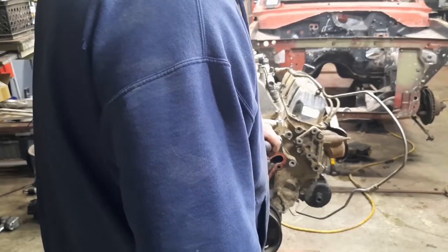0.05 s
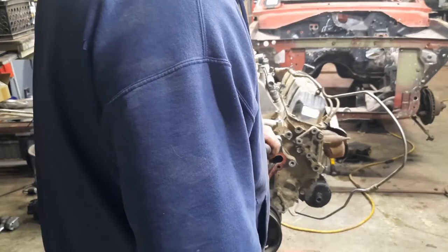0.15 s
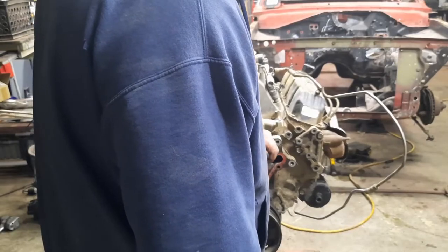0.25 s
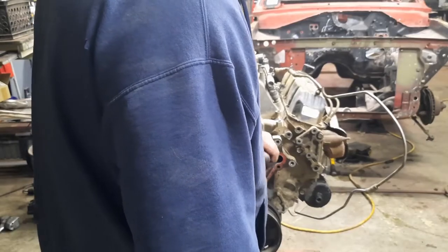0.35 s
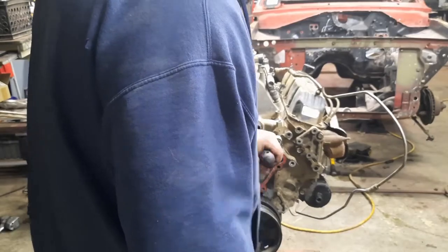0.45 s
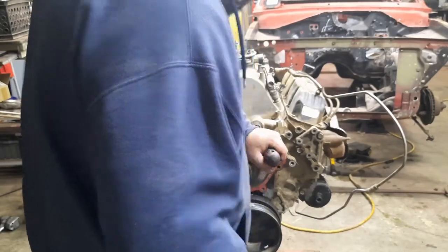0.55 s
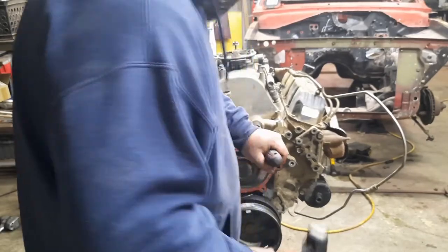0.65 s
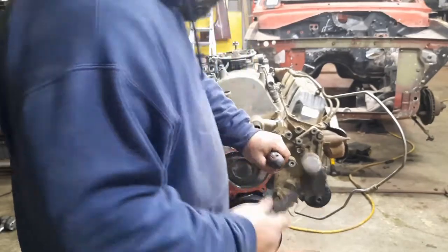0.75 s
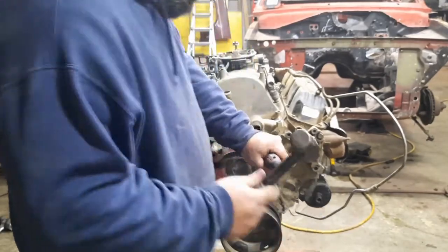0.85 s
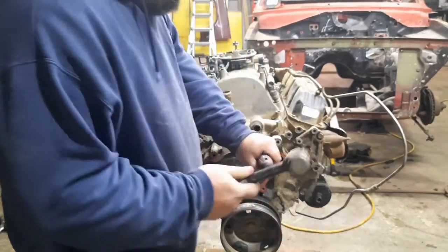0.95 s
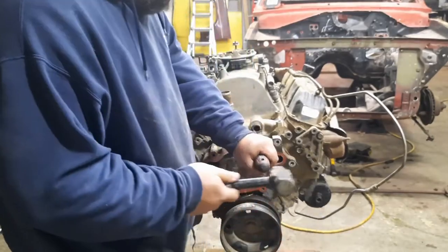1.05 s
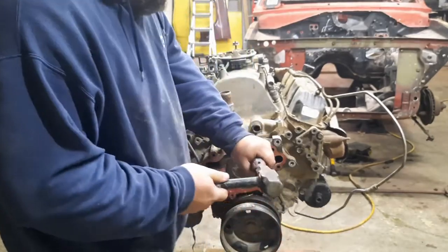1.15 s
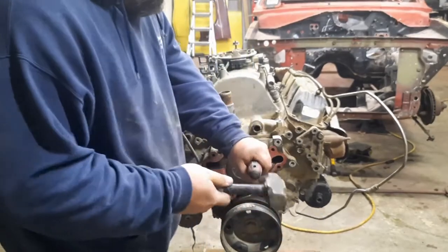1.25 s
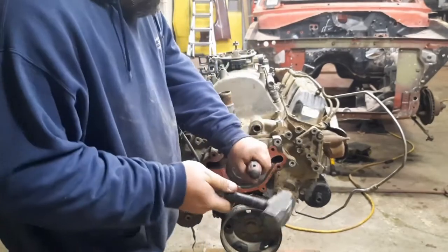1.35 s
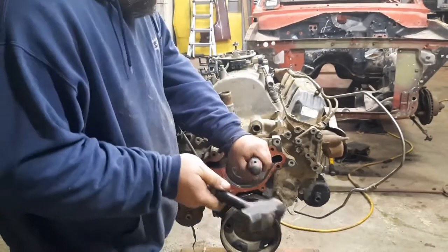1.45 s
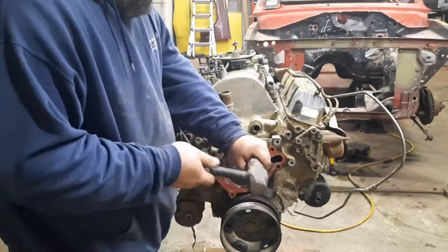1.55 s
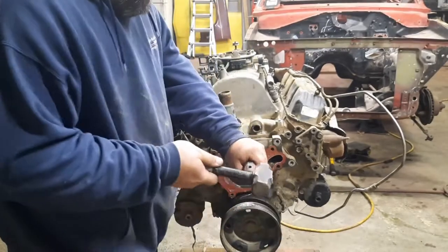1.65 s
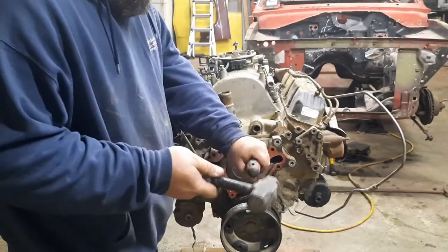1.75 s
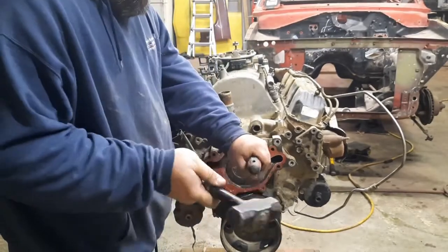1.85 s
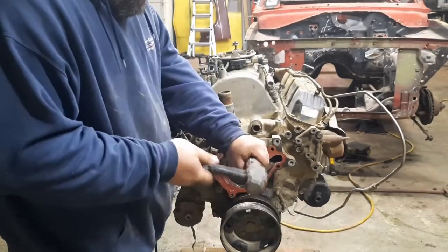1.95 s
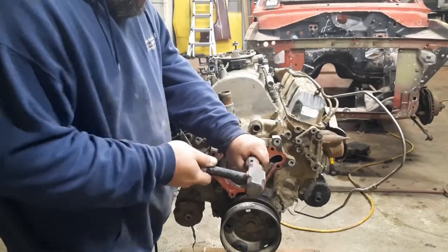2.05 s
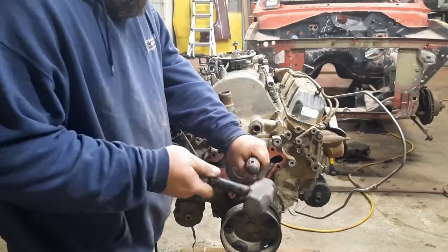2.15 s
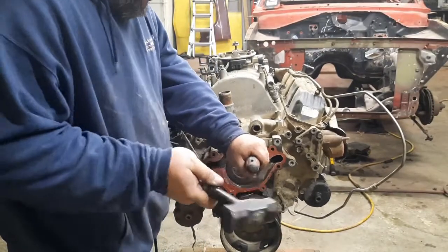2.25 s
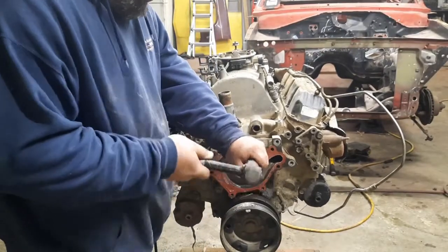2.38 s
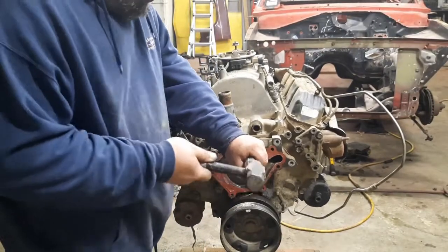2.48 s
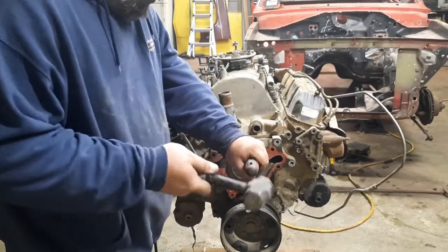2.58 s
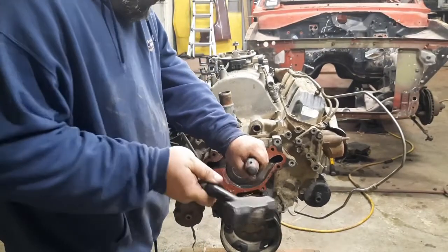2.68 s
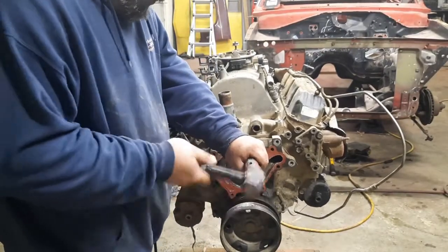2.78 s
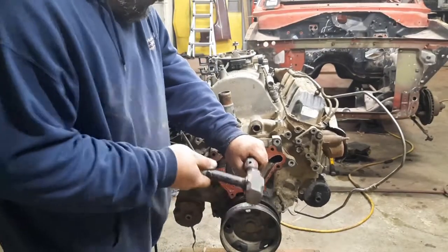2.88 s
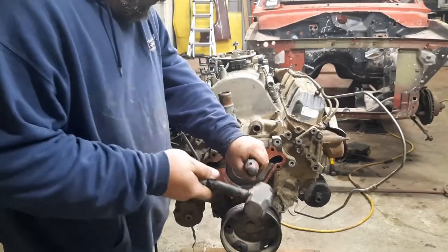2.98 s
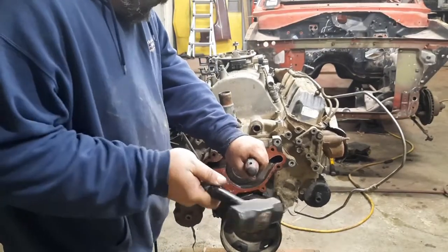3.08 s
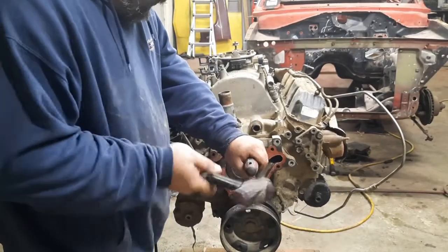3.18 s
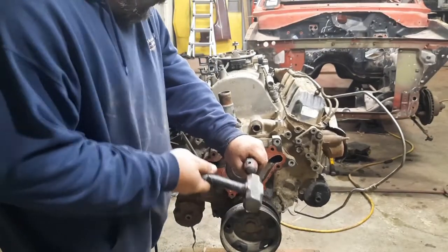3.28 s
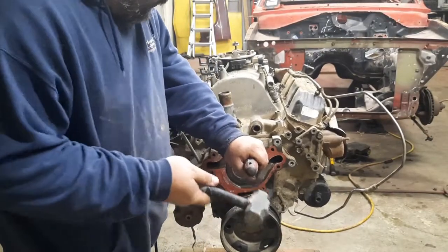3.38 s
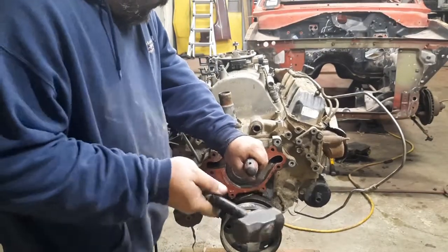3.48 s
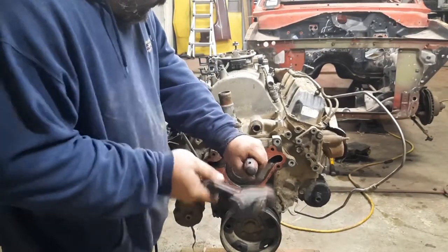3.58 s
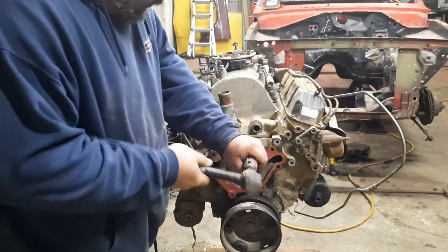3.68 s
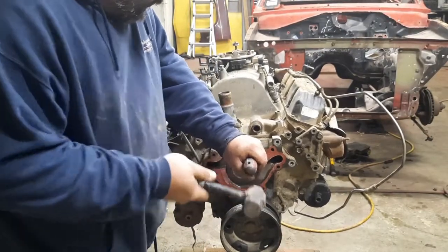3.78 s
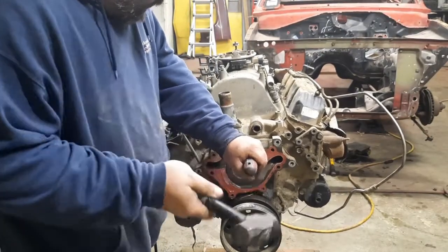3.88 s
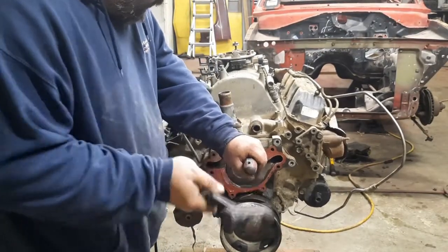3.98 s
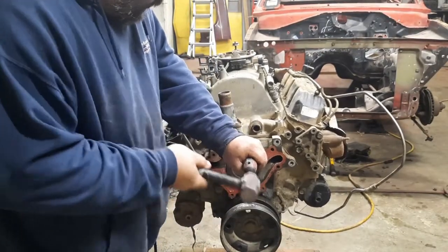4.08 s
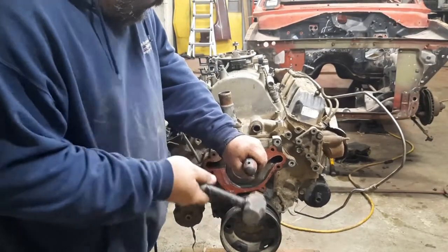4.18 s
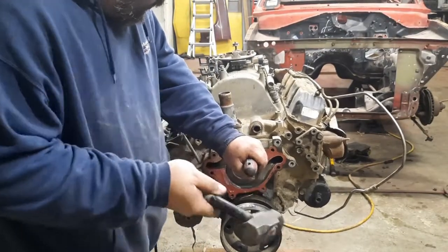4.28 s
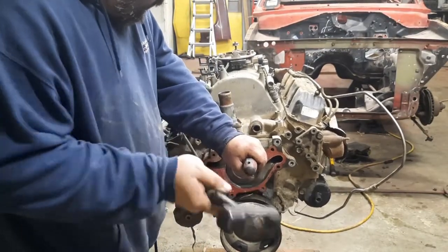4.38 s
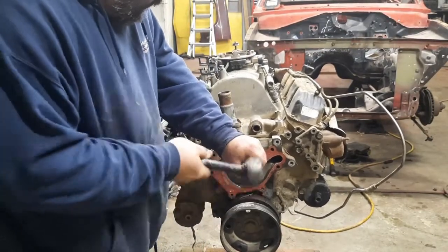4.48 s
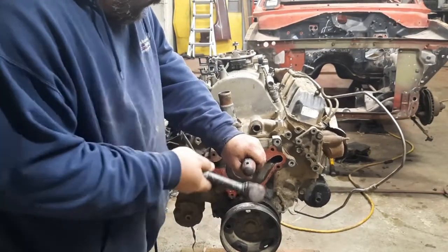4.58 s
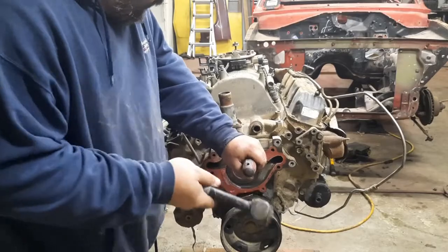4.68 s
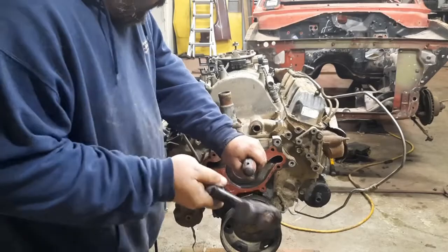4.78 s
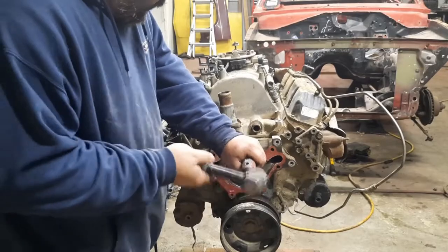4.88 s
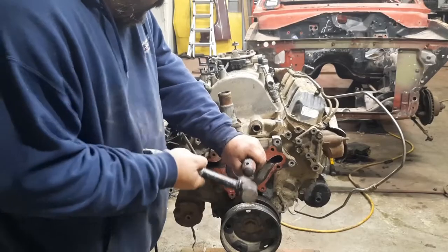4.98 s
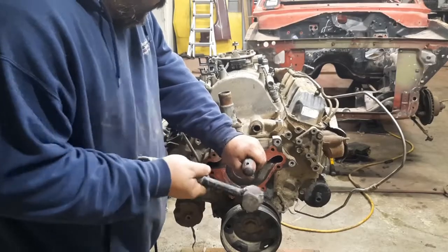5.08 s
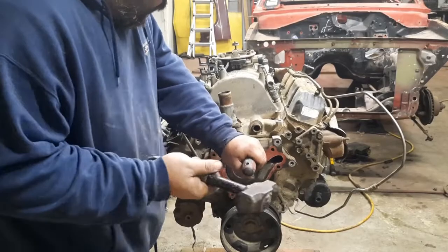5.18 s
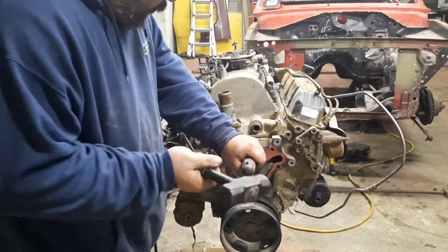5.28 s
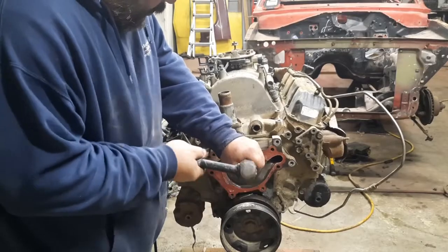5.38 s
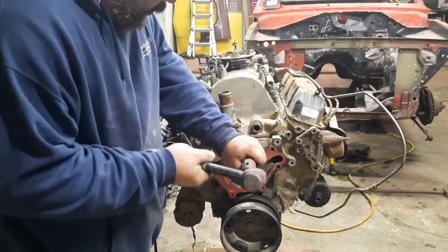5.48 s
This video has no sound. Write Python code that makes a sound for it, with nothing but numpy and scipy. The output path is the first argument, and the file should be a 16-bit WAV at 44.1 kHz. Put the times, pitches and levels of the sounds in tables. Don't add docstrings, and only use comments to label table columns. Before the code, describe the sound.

A hand hammer slides over iron, taps once, then clanks steadily against an engine, each hit booming and echoing off bare walls.

```python
import sys
import numpy as np
from scipy import signal
from scipy.fft import rfft, irfft, next_fast_len
from scipy.io import wavfile
from scipy.ndimage import uniform_filter1d, map_coordinates

SR = 44100
rng = np.random.default_rng(int(sys.argv[2]) if len(sys.argv) > 2 else 0)


def dump(signal):
    limited = np.clip(np.atleast_2d(signal).T, -1, 1)
    pcm = np.round(limited * 32767).astype(np.int16)
    wavfile.write(sys.argv[1], SR, pcm)


def natural_amplitude(level_db):
    exponent = np.asarray(level_db, float) / 20
    return 10 ** exponent


N = 243873

# mode in Hz, level in dB, t60 in s.
TOOL_MODES = [(1910, -3, 0.47), (2697, -7, 0.33), (3450, -2, 0.46), (3560, -7, 0.54), (5470, -9, 0.67),
              (5507, -11, 0.51)]
# start in s, rise in s, hold in s, level in dB, fizz in dB relative to the body.
RUSTLES = [
    (0, 0.00076, .002, -60.5, -5),
    (.46, 0.031, .015, -62, -7.5),
    (.63, 0.053, 0.065, -62.5, -2.5),
]
# start, rise and hold in s, level in dB, fizz in dB.
SLIDES = [
    (.9, 0.051, 0.028, -56, -13),
    (.99, 0.015, 0.11, -36.5, -11),
    (1.5, 0.058, .004, -50.5, -5),
    (1.9, 0.027, 0.03, -75, 6),
]
# frequency in Hz, level in dB per Hz.
SCUFF = [(88, -40), (150, -14), (336, 2), (367, 4.5), (872, -3.5), (953, -4.5), (1200, -3), (2660, -7.5),
         (5000, -21), (6500, -53), (11000, -120)]
GRIND = [(120, -36), (250, -8), (600, -7.5), (850, -9), (960, 2), (1150, -6.5), (2700, -15), (6500, -29)]
FIZZ = [(2000, -0.5), (3500, -1.5), (7500, -3), (9500, -18), (13000, -18), (15500, -46), (16500, -50)]
# frequency in Hz, level in dB per Hz.
AIR = [(59, -19), (100, -19), (248, -50), (305, -19), (368, -11), (568, -16.5), (617, -12), (952, -28),
       (1220, -24), (3090, -44), (14000, -48)]
# frequency in Hz, level in dB rms.
HUM = [(75.4, -68.5), (156.1, -78), (306.8, -69.5)]
# frequency in Hz, level in dB per Hz.
FLOOR = [(24, -16), (40, -4), (70, 11), (129, 1), (167, 8), (203, -7), (220, 0), (290, -31.5), (480, -120)]
# time in s, peak in dB, centre in Hz.
TICKS = [
    (1.0165, -29, 10400),
    (1.2745, -49.5, 10400),
    (1.2857, -29, 7300),
    (1.491, -29, 6850),
]
# time in s, force in dB, seating 0-1 (how firmly the struck part bears on the block),
# turn 0-1 (how far round its face the head lands), heft in dB (push into the casting).
BLOWS = [(1.1297, -9, 0.13, 0.26, -3), (1.57, 0, 0, 0.48, 1), (1.9771, 0.5, 0, 0.17, 1.5),
         (2.3898, 1, 0.51, 0.13, 0), (2.8169, 1.5, 0.57, 0.24, 1), (3.2416, 2.5, 0.76, 0.37, -0.5),
         (3.6572, 2.5, 0.94, 0.5, -1.5), (4.0764, 2.5, 0.99, 0.64, -1.5), (4.4988, 3, 0.92, 0.97, -1),
         (4.9265, 2, 0.81, 0.99, -1), (5.371, 2, 0.38, 0.67, 4.5)]
# level in dB, t60 in s.
CLANK_HZ = [520, 850, 1190, 1360, 1600, 1950, 2380, 2600, 2950, 3700, 4400, 5100, 5700, 7000]
CLANK = [(-1, 0.029), (-8, 0.021), (-8, 0.04), (5.5, 0.013), (-43, 0.0093), (-26, 0.072), (-2, 0.024),
         (-11, 0.0051), (-17, 0.0037), (-19, 0.019), (-3.5, 0.011), (4, 0.0065), (-6, 0.0074), (1, 0.0039)]
FLEXING = [2, 6]
# level in dB, t60 in s.
RING_HZ = [545, 597, 689, 771, 860, 1098, 1212, 1378, 1500, 1731, 2098, 2174, 2222, 2319, 2380, 3219, 3645,
           3881]
RING = [(-31, 0.043), (10, 0.23), (4, 0.51), (5.5, 0.59), (0.5, 0.72), (-6.5, 0.49), (-11, 0.13),
        (-26, 0.16), (-4, 0.79), (-1, 0.098), (-3, 0.22), (-29, 0.65), (-10.5, 0.4), (-34, 0.53),
        (-0.5, 0.42), (-22, 0.25), (-1, 0.26), (-21, .35)]
BOOM_HZ = [286, 335, 391, 438, 414, 465]
BOOM_T60 = [0.77, 0.68, 0.38, 0.73, 0.53, 0.23]
# frequency in Hz, level in dB per Hz.
CRACK = [(60, -18.5), (150, -21.5), (300, 5.5), (600, 4.5), (1200, 2.5), (1800, 1.5), (2300, 3.5),
         (3000, -1.5), (5000, -7), (7500, -12.5), (9500, -19), (13000, -27.5), (15500, -34), (16500, -114)]
# centre in Hz, width in Hz, gain in dB.
DIPS = [(784, 150, -4), (980, 124, -6), (1776, 185, -3.5), (2750, 1100, -4.5), (9600, 900, -5)]
# frequency in Hz, dB when loose, dB gained when seated, dB gained by a full turn.
DIRECT = [(710, -20, 8.5, -2), (1080, -12, 4.5, 0.5), (1340, -6.5, -4, -3.5), (2170, -18, -2.5, 13),
          (3800, -19.5, 8.5, 1), (5100, -14.5, -3, 3), (10600, -22.5, 5.5, 4.5)]
DIFFUSE = [(666, -22, 7.5, 0.15), (935, -12.5, 1, 1), (1510, -10, -1, 0.68), (2180, -17.5, 1, 5.9),
           (3460, -17.5, 6, 0.81), (5160, -20, 6, 0.36), (11200, -20, 2, .3)]
LASTING = [(774, -6, 3.5, -4), (1090, -11, -2, 25), (1210, 10, -10.5, 1), (1340, -3.5, -3.5, 10.5),
           (2240, 1.5, 4, 0), (2380, -7.5, -7.5, 16), (3650, -18, 31, -0.5), (3880, -15, 25, 7)]
BOOM = [(293, -33.5, 10.8, -11.5), (318, -38, 8.2, -3.3), (391, -44, 21.6, 1.2), (396, -47.5, 18.7, 3.7),
        (463, -46.5, 30.2, -7.5), (452, -66, 39, 4)]
# frequency in Hz, correlation.
ALIKE = [(30, 0.93), (300, 0.82), (1000, 0.043), (8000, 0.033)]
# frequency in Hz, t60 in s.
GARAGE = [(100, 0.86), (300, 0.96), (800, 0.67), (2000, 0.72), (5000, 0.71), (9000, 0.57), (14000, 0.44)]
# delay in s, left level in dB, right level in dB.
WALLS = [(.0065, -8, -7), (.011, -20.5, -17), (.021, -28.5, -27), (.028, -23, -17)]
# frequency in Hz, left minus right in dB.
LEFT = [(60, 2.5), (200, 1), (700, 3.5), (1500, 3), (3000, 3.5), (5500, -3.5), (9000, 5.5), (14000, 20.5)]

ROOM_GROWS, RING_GROWS = 1.4, 0.94


def unit(x):
    return x / np.sqrt(np.mean(x ** 2) + 1e-20)


def along(points, hz):
    f, v = np.transpose(points)
    return np.interp(np.log(hz + 1), np.log(f + 1), v)


def filtered(x, response):
    m = next_fast_len(x.shape[-1] + 8192)
    return irfft(rfft(x, m) * response(np.fft.rfftfreq(m, 1 / SR)), m)[..., :x.shape[-1]]


def add(track, s, sound):
    part = track[:, round(s * SR):][:, :sound.shape[1]]
    part += sound[:, :part.shape[1]]


def alike(pair):
    def mixing(hz):
        angle = np.arccos(np.clip(along(ALIKE, hz), -1, 1)) / 2
        return np.array([np.cos(angle), np.sin(angle)])
    mid, side = filtered(pair, mixing)
    return np.array([mid + side, mid - side])


def patches(shape, bins, frames):
    field = uniform_filter1d(rng.standard_normal(shape), size=bins, axis=0)
    return unit(uniform_filter1d(field, size=frames, axis=1))


def rush(spectrum, patchy_db):
    z = signal.stft(rng.standard_normal((2, N)), nperseg=512)[2]
    z = z * natural_amplitude(patchy_db * patches(z.shape[1:], 6, 8))
    pair = signal.istft(z, nperseg=512)[1][:, :N]
    return unit(alike(filtered(pair, lambda hz: natural_amplitude(along(spectrum, hz)))))


def wavering(t, hz, db, t60, rise, rough, rate):
    knots = rng.standard_normal((3, 2, len(hz), 40))
    at = np.clip(t[::64] * rate, 0, 38)
    drift = np.apply_along_axis(lambda k: map_coordinates(k, [at], order=2), -1, knots)
    drift = (drift[0] + 0.75 * drift[1:]) * rough
    echo = np.repeat(1 + drift[:, 0] + 1j * drift[:, 1], 64, axis=-1)[..., :len(t)]
    echo = uniform_filter1d(echo.real, size=64) + 1j * uniform_filter1d(echo.imag, size=64)
    tone = natural_amplitude(db[:, None] - 60 * t / t60[:, None]) * np.exp(2j * np.pi * hz[:, None] * t)
    return np.sum((echo * tone).imag, axis=1) * (1 - np.exp(-t / rise))


def pulse(db_of, size):
    ceps = irfft(np.log(natural_amplitude(db_of(np.fft.rfftfreq(size, 1 / SR)))), size)
    ceps[1:size // 2] *= 2
    ceps[size // 2 + 1:] = 0
    out = irfft(np.exp(rfft(ceps)), size)
    return out / np.linalg.norm(out)


def near(x):
    answer = np.zeros((2, SR // 20))
    answer[:, 0] = 1
    for s, *db in WALLS:
        answer[:, round(s * SR)] += natural_amplitude(db)
    return signal.fftconvolve(x[None], answer, axes=1)


def garage(x):
    hz, t, z = signal.stft(rng.standard_normal((2, SR)), SR, nperseg=256)
    z = z * natural_amplitude(1.57 * patches(z.shape[1:], 4, 5) - 60 * t / along(GARAGE, hz)[:, None])
    tail = alike(signal.istft(z, SR, nperseg=256)[1])
    tail = tail * (1 - np.exp(-(np.arange(tail.shape[1]) / SR / .005) ** 2))
    return signal.fftconvolve(x[None], tail / np.linalg.norm(tail[0]), axes=1)


def earlier():
    track, (hz, db, t60) = np.zeros((2, N)), np.transpose(TOOL_MODES)
    t = np.arange(SR // 2) / SR
    add(track, 0, wavering(t, hz, db - 71.5, t60, rise=0.00072, rough=2.5, rate=75))
    return track


def strokes(rows, fade_db_per_s):
    s, rise, hold, db, fizz_db = np.transpose(rows)[..., None]
    t = np.arange(N) / SR - s
    rising = 20 * np.clip(t / rise - 1, -1, 0)
    fading = fade_db_per_s * np.clip(t - rise - hold, 0, None)
    gain = natural_amplitude(db + rising - fading) * (t >= 0)
    return gain.sum(axis=0), (gain * natural_amplitude(fizz_db)).sum(axis=0)


def rustle():
    cloth, swish = strokes(RUSTLES, fade_db_per_s=98)
    return natural_amplitude(3.0) * cloth * rush(SCUFF, patchy_db=4.0) + natural_amplitude(6.0) * swish * rush(FIZZ, patchy_db=-1.5)


def background():
    t = np.arange(N) / SR
    hum = sum(natural_amplitude(db - 2.0) * np.sin(2 * np.pi * hz * t) for hz, db in HUM)
    return hum + natural_amplitude(-66) * rush(AIR + [(16500, -75)], patchy_db=1.2)


def stand():
    s, force_db, _, _, heft_db = np.transpose(BLOWS)[..., None]
    t = np.clip(np.arange(N) / SR - s, 0, None)
    thud = natural_amplitude(-38 + force_db + heft_db - 60 * t / 0.82) * (1 - np.exp(-t / 0.02))
    rest = natural_amplitude(-62)
    swing = (t / .2 * np.exp(1 - t / .2)) ** 2
    phase = 2 * np.pi * (35.4 - 11 * t) * t + 8.1 * rng.random(s.shape)
    rock = natural_amplitude(-44.5 + 6.2 * np.minimum(force_db, 0)) * swing * np.sin(phase)
    return (rest + thud.sum(axis=0)) * rush(FLOOR, patchy_db=3.5) + rock.sum(axis=0)


def scrape():
    slide, rasp = strokes(SLIDES, fade_db_per_s=596)
    grind = rush(GRIND + [(11000, -120)], patchy_db=3.0)
    return natural_amplitude(3.0) * slide * grind + natural_amplitude(6.0) * rasp * rush(FIZZ, patchy_db=-1.5)


def ticks():
    track = np.zeros((2, N))
    for s, db, hz in TICKS:
        spectrum = lambda f: np.clip(-22 * np.log2(f / hz + 0.015) ** 2, -30, 0)
        click = natural_amplitude(db + 8.0) * pulse(spectrum, size=512)
        add(track, s, near(natural_amplitude(-2.5) * click))
        add(track, s, natural_amplitude(-3.0) * garage(click))
    return track


def shares(table, seating, turn, hz):
    return along([(f, loose + seated * seating + turned * turn) for f, loose, seated, turned in table], hz)


def radiated(table, seating, turn, hz):
    dips = sum(db * np.exp(-((hz - centre) / width) ** 2) for centre, width, db in DIPS)
    return along(CRACK, hz) + shares(table, seating, turn, hz) + dips


def part_clank(t, seating, turn):
    hz, (level, t60) = np.array(CLANK_HZ), np.transpose(CLANK)
    hz = hz * (1 - 0.073 * turn * np.isin(np.arange(len(hz)), FLEXING))
    db = level + shares(DIRECT, seating, turn, hz) + 6.0
    t60 = t60 * (1 - .45 * (1 - seating))
    hz = hz * (1 + .007 * rng.standard_normal(len(hz)))
    modes = natural_amplitude(db[:, None] - 60 * t / t60[:, None]) * np.sin(2 * np.pi * hz[:, None] * t)
    return np.sum(modes, axis=0) * (1 - np.exp(-t / 0.00091))


def contact(t, seating, turn):
    colour = lambda f: radiated(DIRECT, seating, turn, f)
    hiss = unit(filtered(rng.standard_normal(len(t)), lambda f: natural_amplitude(colour(f))))
    chatter = natural_amplitude(-6.0) * hiss * natural_amplitude(-60 * t / 0.022) * (1 - np.exp(-t / 0.001))
    brighter = lambda f: colour(f) + 2 * np.log2(f / 1000 + .1)
    return chatter + natural_amplitude(-12) * pulse(brighter, size=len(t))


def block_ring(t, force_db, seating, turn):
    hz, (level, t60) = np.array(RING_HZ), np.transpose(RING)
    db = level + shares(LASTING, seating, turn, hz) + RING_GROWS * force_db - 36
    return wavering(t, hz, db, t60, rise=0.00094, rough=.45, rate=16.1)


def block_boom(t, push_db, seating, turn):
    hz, t60 = np.array(BOOM_HZ), np.array(BOOM_T60)
    db = shares(BOOM, seating, turn, hz) + push_db
    beat = np.tanh(2.2 * np.sin(np.pi * t / 0.178))
    lowest = wavering(t, hz[:1], db[:1] + 6.5, t60[:1], rise=0.0064, rough=0.36, rate=14.7)
    others = wavering(t, hz[1:], db[1:] + 4.5, t60[1:], rise=0.008, rough=0.38, rate=20.0)
    return beat * lowest + others


def hammer():
    track, t = np.zeros((2, N)), np.arange(SR // 2) / SR
    short = t[:SR // 10]
    for s, force_db, seating, turn, heft_db in BLOWS:
        add(track, s, block_ring(t, force_db, seating, turn))
        add(track, s, block_boom(t, force_db + heft_db, seating, turn))
        clank = part_clank(short, seating, turn)
        add(track, s, near(natural_amplitude(force_db) * (clank + contact(short, seating, turn))))
        burst = pulse(lambda f: radiated(DIFFUSE, seating, turn, f), size=8192)
        add(track, s, garage(natural_amplitude(ROOM_GROWS * force_db + 12) * burst))
        add(track, s, garage(natural_amplitude(ROOM_GROWS * force_db - 9.5) * clank))
    return track


def scene():
    return earlier() + rustle() + background() + stand() + scrape() + ticks() + hammer()


def roll_off(x):
    return signal.sosfilt(signal.butter(12, 16680, fs=SR, output="sos"), x)


def record(dry):
    x = filtered(dry, lambda hz: natural_amplitude(np.outer([.5, -.5], along(LEFT, hz))))
    x = x / (1 + np.abs(x / 1.02) ** 5) ** (1 / 5)
    top = lambda hz: 1 / np.sqrt(1 + (hz / 16000) ** 40)
    bottom = lambda hz: 1 / np.sqrt(1 + (36 / (hz + 1)) ** 6)
    mix = filtered(x, lambda hz: top(hz) * bottom(hz))
    return roll_off(mix)


dry = scene()
out = record(dry)
dump(out)
```